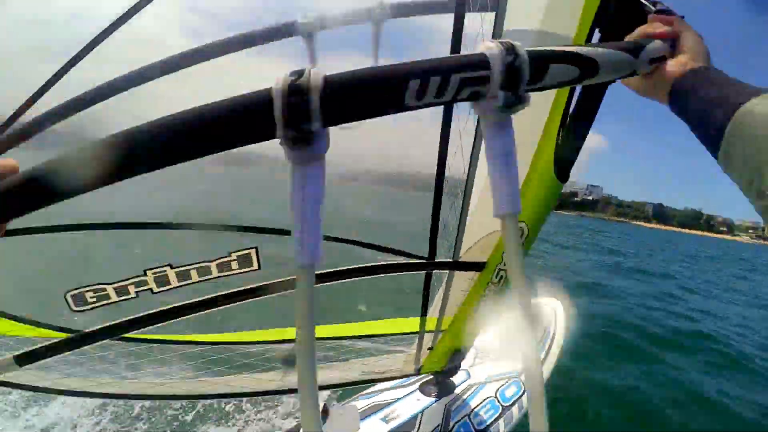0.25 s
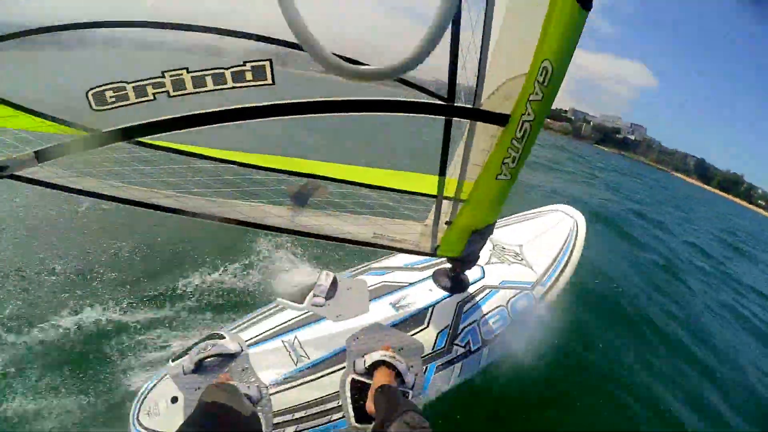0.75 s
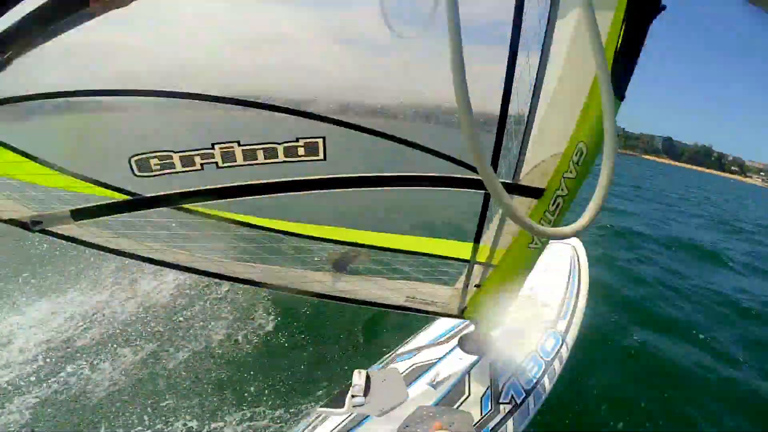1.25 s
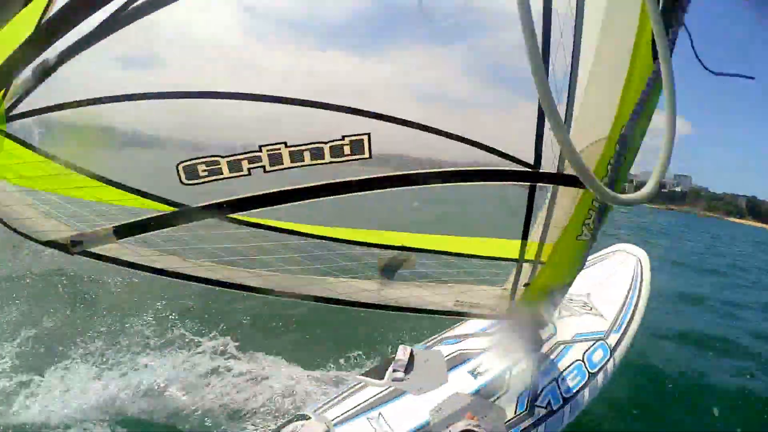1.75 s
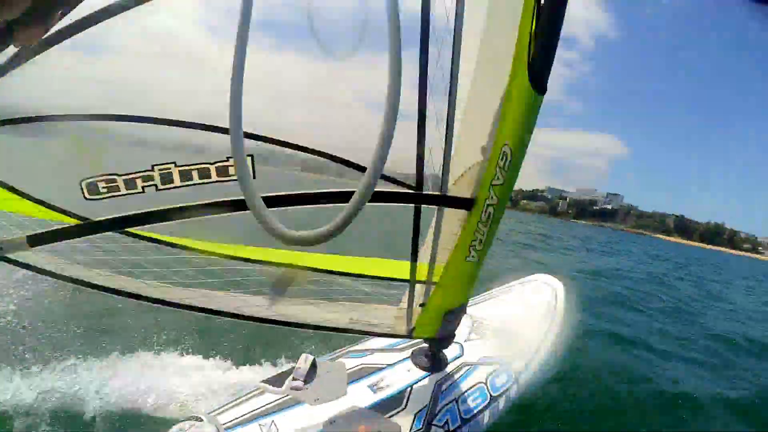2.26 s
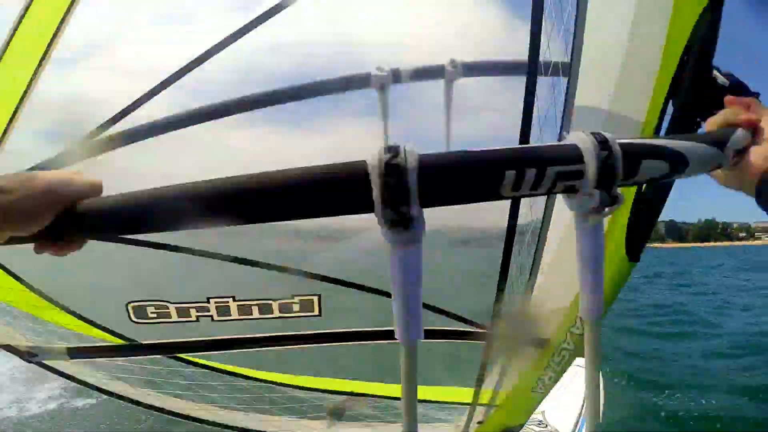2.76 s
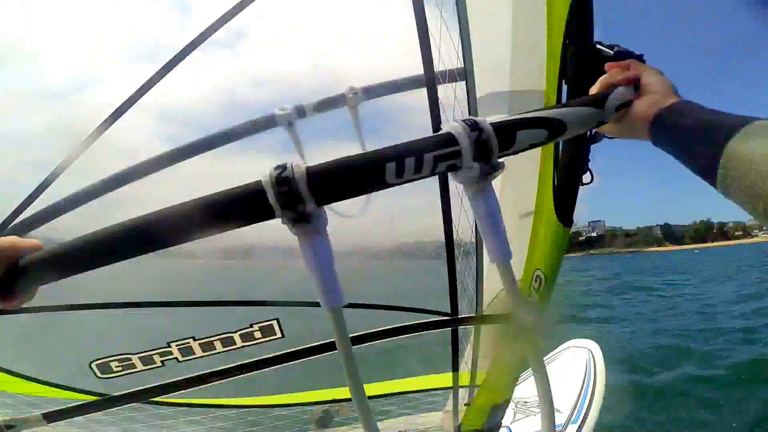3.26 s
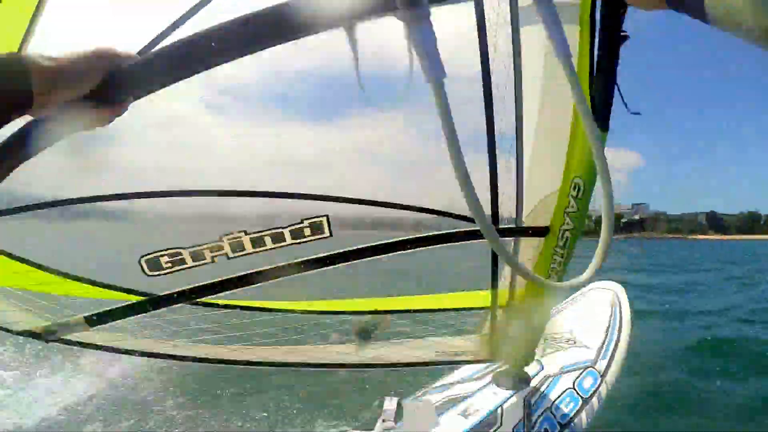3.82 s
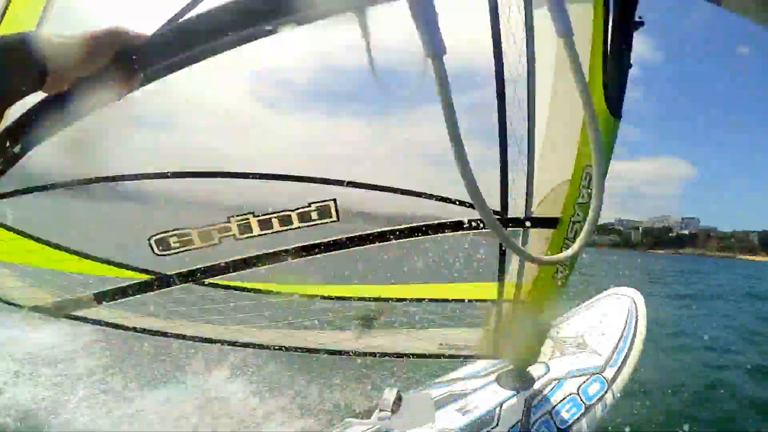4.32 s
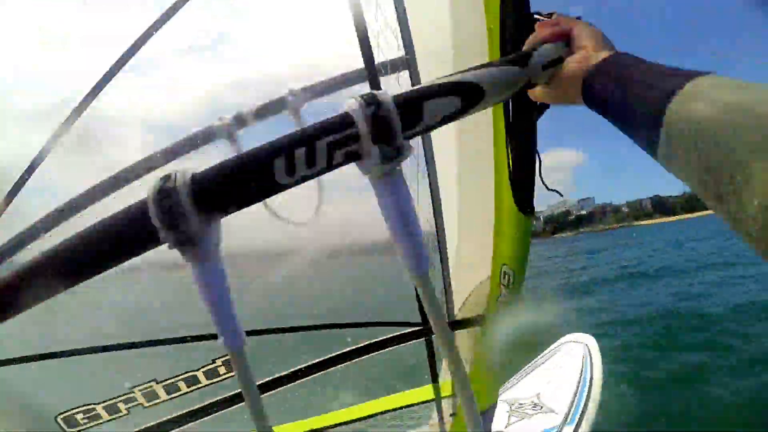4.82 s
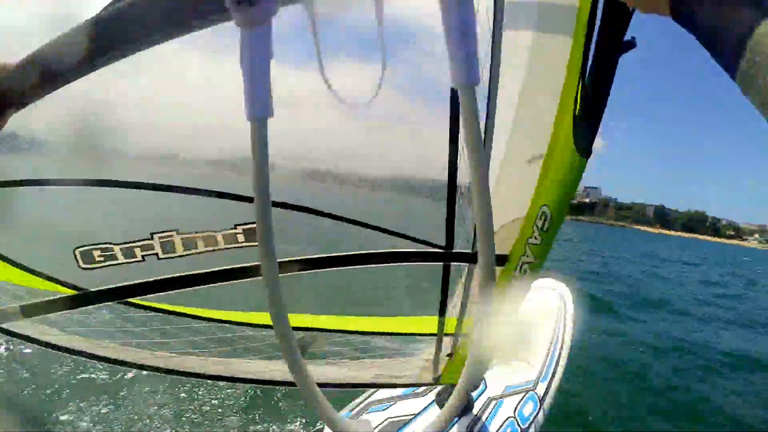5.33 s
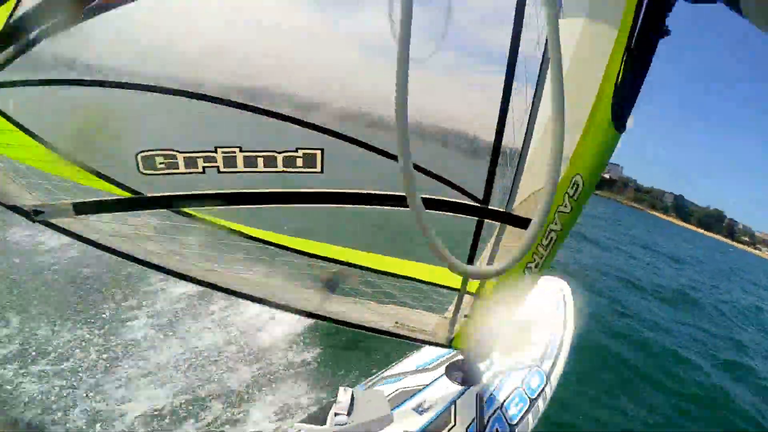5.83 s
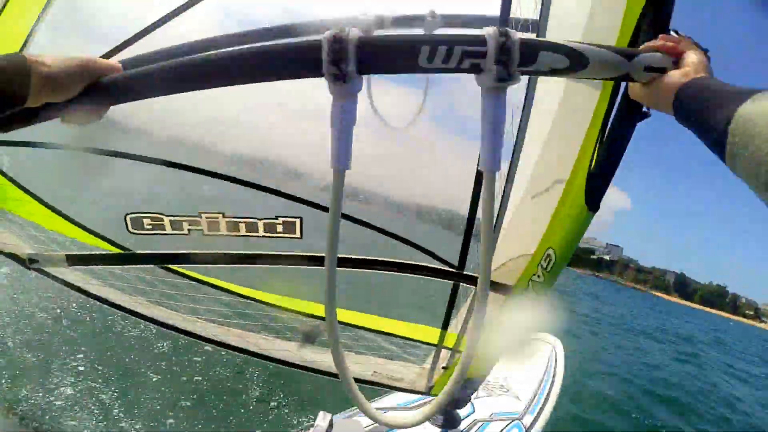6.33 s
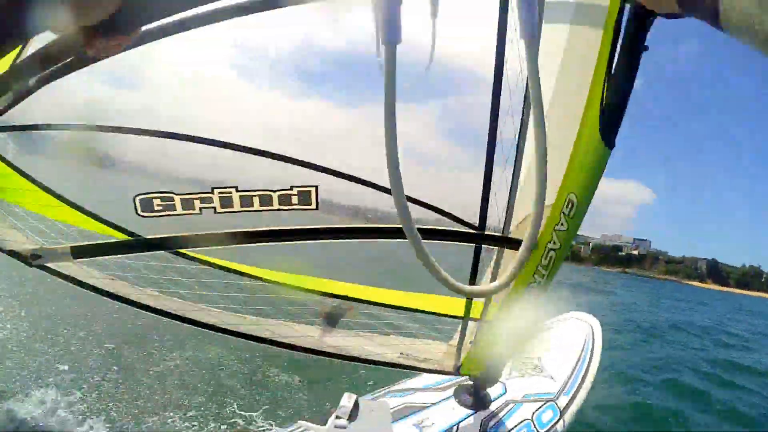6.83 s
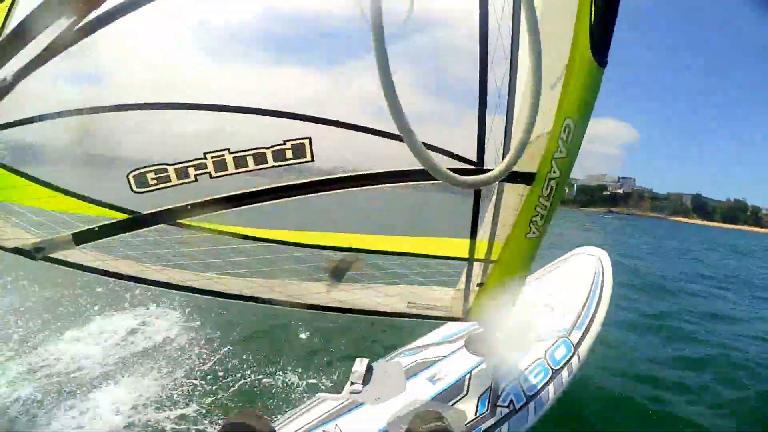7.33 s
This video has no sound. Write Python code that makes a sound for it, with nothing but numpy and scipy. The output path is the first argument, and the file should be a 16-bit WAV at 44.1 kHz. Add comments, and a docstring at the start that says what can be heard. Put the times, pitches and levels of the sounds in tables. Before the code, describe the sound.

A windsurf board races over chop, heard from a small waterproof housing on the sailor. Throughout, bubbly water rushes and gurgles along the rail, with hissing spray in short irregular bursts and dull roars on harder splashes. A strong hollow slap lands at 0.3 seconds, then splashes follow around 0.7, 1.0 and 1.5, where a heavy low gust thumps. Near 1.75 and 2.3, tiny gliding gulps of trapped air sound under the hull. Knocks grow frequent from 2 to 4 seconds. Sharp drops tick on the housing at 3.7 to 4.3 and at 4.8, with a bright splash at 4.1 and a hard double slap at 4.6. Afterwards slaps thin out, but splashes continue around 5.2, 5.5, 6.0, 6.5 and 7.0. A weak wavering rig tone comes and goes; a last gust and splash swell at 7.5.

```python
"""Windsurf board over chop

A board planes over chop, heard from a small waterproof housing worn by the sailor.
Wash, spray and droplets are coloured noise and random grains that surge with each splash.
Chop slaps the hull in short hollow knocks and drops tick on the housing: clicks into ringing modes.
Wind is lumpy low noise over a slow heave; the rig sounds a faint wavering note.
Two short gliding tones are air pockets gulping under the hull."""
import sys
import numpy as np
from scipy import signal
from scipy.fft import rfft, irfft
from scipy.io import wavfile

SR = 44100
rng = np.random.default_rng(int(sys.argv[2]) if len(sys.argv) > 2 else 0)


def to_wav(s):
    """Save 16-bit WAV."""
    ch = np.atleast_2d(s).T  # columns
    pcm = np.round(np.clip(ch, -1, 1) * 32767)  # PCM
    wavfile.write(sys.argv[1], SR, pcm.astype(np.int16))


N = 334278


def from_db(db):
    """Decibels to amplitude gain."""
    return 10 ** (np.asarray(db) / 20)


def rms_one(x):
    """Scale to unit rms."""
    return x / np.sqrt(np.mean(x ** 2) + 1e-20)


def in_time(rows):
    """Interpolate each column of a (time, values...) table at every sample."""
    s, *columns = np.transpose(rows)
    t = np.arange(N) / SR
    return [np.interp(t, s, column) for column in columns]


def coloured(x, spectrum):
    """Filter by a spectrum, linear in dB over log frequency and silent outside it; rms 1."""
    hz, db = np.transpose(spectrum)
    bins = np.maximum(np.fft.rfftfreq(N, 1 / SR), 1e-3)
    gain_db = np.interp(np.log(bins), np.log(hz), db, left=-np.inf, right=-np.inf)
    return rms_one(irfft(rfft(x) * from_db(gain_db), N))


def drift(corner_hz):
    """Smooth random curve, rms 1: noise rolled off above the corner."""
    bins = np.fft.rfftfreq(N, 1 / SR)
    spectrum = rfft(rng.standard_normal(N))
    return rms_one(irfft(spectrum / (1 + (bins / corner_hz) ** 2), N))


def ring(clicks, hz, t60_s):
    """Two-pole resonator: a unit click starts a decaying sine of height 1."""
    radius = from_db(-60 / (t60_s * SR))
    w = 2 * np.pi * hz / SR
    feedback = [1, -2 * radius * np.cos(w), radius * radius]
    return signal.lfilter([0, np.sin(w)], feedback, clicks + 1e-18)


def clicks_at(times_s, level_db):
    """One click of the given level at each time."""
    out = np.zeros(N)
    index = np.clip(np.round(times_s * SR).astype(int), 0, N - 1)
    np.add.at(out, index, from_db(level_db))
    return out


def grains(per_s, spread_db):
    """Random tiny impacts, many weak and a few strong; rms 1."""
    sizes = from_db(spread_db * np.minimum(rng.exponential(1, N), 5))
    signs = rng.choice([-1, 1], N)
    present = rng.random(N) < per_s / SR
    return rms_one(sizes * signs * present)


def swells(floor_db, crests_s, lengths_s, peaks_db, rise, fall, shape):
    """Level in dB of a floor plus events, summed in power; rise and fall are shares of length."""
    t = np.arange(0, N + 32, 32) / SR
    age = (t - crests_s[:, None]) / lengths_s[:, None]
    flank = np.abs(age / np.where(age < 0, rise, fall)) ** shape
    events = from_db(peaks_db)[:, None] * np.exp(-np.minimum(flank, 20))
    power = np.sum(events ** 2, axis=0)
    return 10 * np.log10(from_db(floor_db) ** 2 + np.interp(np.arange(N) / SR, t, power))


# steady rush of the wake between splashes: (time [s], level [dB])
WAKE_RUSH = [(0.0, -39.5), (0.2, -38.5), (0.39, -42), (0.6, -36.5), (0.97, -41.5), (1.33, -37), (1.75, -44),
             (2.3, -41), (2.6, -40.5), (3.1, -38.5), (3.35, -43), (3.55, -38), (4.03, -42.5), (4.85, -43.5),
             (5.85, -36.5), (6.36, -44), (6.65, -40.5), (7.3, -41)]
# churning of the water along the rail: (time [s], level [dB])
RAIL_CHURN = [(0.0, -44.5), (0.95, -45.5), (1.55, -41), (1.8, -45.5), (2.2, -38.5), (2.87, -43), (4.4, -43),
              (5.7, -42), (6.4, -43.5), (7.5, -43.5)]
# splashes thrown off waves:
# (crest time [s], length [s], wash level [dB], spray level [dB], housing droplet level [dB])
WAVE_SPLASHES = [(0.285, 0.026, -34.5, -26.5, -45), (0.466, 0.017, -33.5, -30.5, -58),
                 (0.699, 0.035, -30.5, -24.5, -49), (1.038, 0.026, -33, -26, -53),
                 (1.451, 0.048, -30.5, -24.5, -56), (1.537, 0.096, -31.5, -33.5, -63),
                 (1.946, 0.038, -29, -26, -47), (2.212, 0.036, -49, -33, -60),
                 (2.425, 0.047, -31, -29.5, -48), (2.719, 0.028, -32.5, -29, -51),
                 (3.17, 0.065, -34, -34.5, -53), (3.657, 0.03, -32, -34, -45),
                 (3.7, 0.073, -36.5, -42, -47), (3.916, 0.022, -31.5, -49, -58),
                 (4.104, 0.017, -26, -25, -45), (4.234, 0.027, -51, -28.5, -38),
                 (4.278, 0.054, -32, -28, -50), (4.562, 0.063, -36.5, -32, -44),
                 (4.662, 0.036, -34, -24, -38), (4.868, 0.013, -56, -34, -69),
                 (4.953, 0.04, -37.5, -39.5, -58), (5.004, 0.081, -48, -35.5, -47),
                 (5.21, 0.034, -30, -25, -42), (5.27, 0.041, -38.5, -32.5, -55),
                 (5.434, 0.031, -34.5, -40, -62), (5.517, 0.003, -31, -21, -57),
                 (5.594, 0.035, -36.5, -29, -61), (5.94, 0.11, -52, -33.5, -45),
                 (6.002, 0.051, -28.5, -28.5, -47), (6.13, 0.03, -48, -27.5, -64),
                 (6.192, 0.052, -37, -27, -54), (6.455, 0.093, -38.5, -27.5, -49),
                 (6.532, 0.026, -30.5, -26.5, -53), (6.997, 0.042, -30.5, -29, -43),
                 (7.49, 0.066, -31, -28, -41.5)]
MIST_DB = -14  # droplets that always reach the housing, relative to the wake


def surges():
    """Each splash lifts wash, spray and droplets above their floors; the three levels in dB."""
    (wake_db,), (churn_db,) = in_time(WAKE_RUSH), in_time(RAIL_CHURN)
    s, length_s, *peaks_db = np.transpose(WAVE_SPLASHES)
    floors_db = (churn_db, wake_db, wake_db + MIST_DB)
    return [swells(floor_db, s, length_s, peak_db, rise=0.45, fall=0.73, shape=0.64)
            for floor_db, peak_db in zip(floors_db, peaks_db)]


# wash colour through the housing: (frequency [Hz], relative density [dB per Hz])
WASH_COLOUR = [(200, -1.5), (350, -10.5), (580, -9), (720, -5), (900, -5.5), (1020, -5), (1150, -1),
               (1310, 3.5), (1460, -7), (1650, -2.5), (1870, 3.5), (2030, 0), (2250, -10.5), (3200, -5.5)]


def wash(level_db):
    """Bubbles burst in the churned water along the rail, in uneven clumps."""
    bursts = grains(per_s=5000, spread_db=1.5) * from_db(2.7 * drift(25))
    return from_db(level_db + 0.7) * coloured(bursts, WASH_COLOUR)


def gurgle(level_db, per_s, cycles):
    """Larger bubbles in the wash ring long enough to have a pitch, down 60 dB after `cycles`."""
    pitches_hz = np.geomspace(850, 2150, 24)
    sizes = from_db(3.5 * rng.standard_normal(N).clip(-2, 2))
    born = rng.random(N) < per_s / SR
    dealt = rng.integers(0, len(pitches_hz), N)
    rings = sum(ring(sizes * born * (dealt == k), hz, cycles / hz) for k, hz in enumerate(pitches_hz))
    return from_db(level_db - 5) * rms_one(rings)


# roar of solid water thrown aside: (frequency [Hz], relative density [dB per Hz])
PLUNGE_COLOUR = [(150, -9), (300, 3.5), (450, -1.5), (600, -11), (760, 4.5), (950, -20), (1200, -19)]


def plunge(level_db, steepness):
    """Only a hard surge throws solid water: the dull roar outgrows the wash, up to a cap."""
    roar_db = -38.5 + steepness * np.minimum(level_db + 33, 2)
    return from_db(roar_db) * coloured(grains(per_s=2500, spread_db=2.5), PLUNGE_COLOUR)


# spray colour through the housing: (frequency [Hz], relative density [dB per Hz])
SPRAY_COLOUR = [(1900, -6), (2400, -16.5), (3200, -8), (3500, 1.5), (3750, 1), (4050, -2.5), (4450, -6),
                (4720, -19), (5600, -21), (6550, -17), (7100, -25.5), (7700, -29.5), (10700, -30.5),
                (14000, -37.5)]


def spray(level_db):
    """The thrown sheet of spray falls back as a dense fizz."""
    fizz = grains(per_s=18000, spread_db=3.5) * from_db(1.74 * drift(46))
    return from_db(level_db + 1.3) * coloured(fizz, SPRAY_COLOUR)


# droplet colour on the housing: (frequency [Hz], relative density [dB per Hz])
SHOWER_COLOUR = [(2000, -26), (3000, -11), (4000, 13), (5200, 7.5), (6600, 15.5), (7800, 0.5), (9500, -3),
                 (10800, 6.5), (12500, -12), (14500, -12)]


def shower(level_db):
    """Fine droplets patter on the housing; coarse ones join in only when the level is high."""
    coarse = np.clip((level_db + 39) / 12, 0, .8)  # share of power
    fine_drops = np.sqrt(1 - coarse) * rng.standard_normal(N)
    coarse_drops = np.sqrt(coarse) * grains(per_s=3200, spread_db=7)
    gain = from_db(level_db + 1.0 + 3 * coarse)
    return gain * coloured(fine_drops + coarse_drops, SHOWER_COLOUR)


# gusts on the housing: (crest time [s], length [s], buffeting level [dB], heave level [dB])
AIR_GUSTS = [(0.233, 0.017, -44, -9), (0.396, 0.049, -28.5, -14.5), (0.626, 0.076, -30, -12.5),
             (0.828, 0.048, -29.5, -17), (1.56, 0.052, -20.5, -2.5), (1.99, 0.13, -25, -13),
             (2.186, 0.082, -30.5, -11.5), (2.54, 0.19, -33, -19), (2.868, 0.047, -30, -19.5),
             (3.043, 0.03, -34, -13.5), (3.218, 0.048, -22.5, -9.5), (3.434, 0.093, -33, -12.5),
             (3.78, 0.15, -25, -11.5), (4.197, 0.08, -25.5, -10.5), (4.46, 0.07, -44, -16.5),
             (4.669, 0.045, -26, -5), (4.87, 0.017, -22.5, -13), (5.16, 0.031, -29.5, -11),
             (5.315, 0.056, -27, -5.5), (5.52, 0.054, -32.5, -17), (6.064, 0.079, -27.5, -15),
             (6.257, 0.027, -40, -15), (6.628, 0.056, -29.5, -17.5), (6.795, 0.027, -36, -13.5),
             (7.082, 0.076, -27.5, -12), (7.59, 0.079, -19.5, -6.5)]
BREEZE_DB, BREEZE_HEAVE_DB = -39, -25  # steady headwind between gusts


def gusts():
    """Each gust lifts buffeting and heave above the steady headwind; the two levels in dB."""
    s, length_s, *peaks_db = np.transpose(AIR_GUSTS)
    return [swells(floor_db, s, length_s, peak_db, rise=0.66, fall=1, shape=1.07)
            for floor_db, peak_db in zip((BREEZE_DB, BREEZE_HEAVE_DB), peaks_db)]


# buffeting colour through the housing: (frequency [Hz], relative density [dB per Hz])
BUFFET_COLOUR = [(22, -22), (31, 9.5), (45, 11.5), (70, 2), (110, -3), (200, -12), (300, -20.5), (500, -25),
                 (900, -42)]


def wind(level_db, apart_db):
    """Small eddies buffet the housing in lumps, almost alike left and right."""
    mid, side = (coloured(rng.standard_normal(N), BUFFET_COLOUR) for _ in range(2))
    lumps = rms_one(from_db(3.6 * drift(25)))
    stereo = mid + from_db(apart_db) * side * np.array([[1], [-1]])
    return from_db(level_db + 4.5) * lumps * stereo


def heave(level_db, hz, lean_db):
    """Large eddies rock the pressure at the very bottom of hearing, a little more on the left."""
    rate_hz = hz * from_db(1.8 * drift(15.05))
    rocking = rms_one(np.sin(2 * np.pi * np.cumsum(rate_hz) / SR))
    return from_db(level_db) * rocking * from_db([[lean_db], [-lean_db]])


# single drops on the housing: (time [s], level [dB])
HOUSING_DROPS = [(0.228, -24), (1.546, -22), (1.999, -22), (3.1662, -23), (3.7074, -19), (3.7122, -12.5),
                 (3.8117, -16.5), (3.929, -24), (3.954, -18), (4.0974, -23.5), (4.231, -34), (4.2482, -23),
                 (4.2653, -16), (4.2955, -12.5), (4.306, -18), (4.3291, -25), (4.5926, -19), (4.605, -21),
                 (4.7059, -19), (4.715, -20), (4.804, -11.5), (5.2034, -33), (5.5144, -39)]
# ringing of the housing wall: (frequency [Hz], level [dB], t60 [s])
HOUSING_MODES = [(1470, -4, 0.0042), (2560, 0.5, 0.0039), (3100, -3.5, 0.0083), (4010, -2, 0.0041),
                 (5160, -3.5, 0.0044), (5320, -8, 0.0079), (6460, -10, 0.0044), (8400, -8.5, 0.00099),
                 (10300, -12.5, 0.0021), (13000, -22, 0.0024)]


def drops(splat_s, splat_db):
    """Drops burst on the housing: a sharp tick and a brief ragged splat into its wall modes."""
    s, level_db = np.transpose(HOUSING_DROPS)
    ticks = clicks_at(s + 0.00069, level_db - 2.0)
    fade = np.exp(-1 / (splat_s * SR))
    envelope = signal.lfilter([np.sqrt(1 - fade ** 2)], [1, -fade], ticks + 1e-18)
    splats = envelope * rng.standard_normal(N)
    force = ticks + from_db(splat_db) * splats
    return sum((-1) ** k * ring(force, hz, t60_s) * from_db(db)
               for k, (hz, db, t60_s) in enumerate(HOUSING_MODES))


# hollow knock of the hull: (frequency [Hz], level [dB], t60 [s])
KNOCK_MODES = [(837, -6.5, 0.036), (895, 6, 0.031), (1030, 5.5, 0.0034), (1146, 1, 0.023),
               (1289, 3.5, 0.036), (1480, 8.5, 0.0068), (1690, -4, 0.0035), (1925, 9, 0.014),
               (3030, -2.5, 0.012), (3300, -11, 0.014), (1000, -13.5, 0.11)]
# flexing of the hull: (frequency [Hz], level [dB], t60 [s])
FLEX_MODES = [(146, 18.5, 0.016), (171, 4.5, 0.025), (218, 4, 0.045)]
KNOCK_HZ, SMACK_HZ = 1080, 1790  # hardness tilts the modes between these pitches
SLAP_RING_S = 0.12


def slap(strength_db, hardness_db, thump_db, trail_db, trail_s, detune, scatter_db):
    """A slap rings the hollow modes, the higher ones more when hard; the hull flexes with a thump."""
    hit = np.zeros(int(SLAP_RING_S * SR))
    hit[0] = 1
    # uneven landing: weaker contacts trail the first by a few milliseconds
    lags_s = trail_s * (0.304 + rng.random(3))
    contacts = hit + from_db(trail_db) * sum(np.roll(hit, int(lag_s * SR)) for lag_s in lags_s)
    # the wetted patch differs from wave to wave and shifts the pitch
    tuning = 1 + detune * rng.uniform(-1, 1)
    knock = 0
    for k, (hz, db, t60_s) in enumerate(KNOCK_MODES):
        tilt_db = hardness_db * np.interp(hz, [KNOCK_HZ, SMACK_HZ], [0, 1])
        mode_db = strength_db + tilt_db + db + scatter_db * rng.standard_normal()
        gain = from_db(mode_db) * (-1) ** (k // 2)
        # pressure follows wall velocity, so little spills below each mode
        velocity = np.diff(ring(contacts, hz * tuning, t60_s), prepend=0) * SR / (2 * np.pi * hz)
        knock += gain * velocity
    flex = sum(from_db(thump_db + db + scatter_db * rng.standard_normal()) * ring(hit, hz, t60_s)
               for hz, db, t60_s in FLEX_MODES)
    # the broad push that flexes the hull is too slow to reach the middle range
    return knock + signal.sosfilt(signal.butter(2, 330, fs=SR, output="sos"), flex)


# chop on the hull: (time [s], strength [dB], hardness: high modes over low [dB], thump [dB])
HULL_SLAPS = [(0.2984, -11, -10, -30.5), (0.324, -30, -17, -36), (0.3715, -22, -11, -32),
              (0.386, -42, -1, -33.5), (0.61, -24.5, -11, -48), (0.6141, -23.5, -3, -40),
              (0.818, -34.5, -6, -40.5), (1.817, -31.5, -0.5, -40), (1.829, -39, 0, -30.5),
              (1.942, -34, -7, -39), (1.9973, -18, 6, -25), (2.178, -26, -9, -34), (2.282, -31, -23, -39.5),
              (2.437, -23, -9, -40), (2.487, -27.5, -38, -38), (2.554, -31, -6, -40), (2.58, -28, -14, -49),
              (2.619, -30.5, -26, -41), (2.679, -23, -2, -39.5), (2.687, -26, -34, -56),
              (3.0237, -18.5, -14, -45), (3.2097, -24.5, -0.5, -30.5), (3.263, -25.5, -10, -39),
              (3.283, -20.5, 1.5, -31.5), (3.391, -25, -21, -44), (3.478, -25.5, -3.5, -39.5),
              (3.591, -43.5, 15, -43), (3.692, -19, -4, -51), (3.697, -19.5, -2, -30.5),
              (3.76, -32.5, 3.5, -32), (3.814, -18, -3, -26.5), (3.868, -28, -1.5, -36),
              (3.911, -23, -22, -34), (3.927, -29.5, -3, -37), (4.221, -30, -6, -31.5),
              (4.327, -26, -11, -51), (4.6256, -11.5, -3, -35), (4.631, -17, -1.5, -25),
              (4.679, -31.5, 5, -39), (4.707, -28.5, 8, -44), (4.714, -24.5, 0, -53),
              (5.204, -34.5, 8, -49), (5.994, -25, -14, -53), (6.066, -34, -13, -41),
              (6.1164, -31.5, 2, -36.5), (6.535, -33.5, -3, -49), (6.658, -35, -4, -47),
              (7.0597, -20, -1, -38), (7.493, -23.5, -7, -42)]
RIPPLES_COUNT = 8
RIPPLE_STRENGTH_DB, RIPPLE_HARDNESS_DB, RIPPLE_THUMP_DB = -34.5, 1, -41


def chop():
    """The distinct slaps, and small ripples scattered at random times."""
    times_s = rng.random(RIPPLES_COUNT) * N / SR
    ripples = [(s, RIPPLE_STRENGTH_DB, RIPPLE_HARDNESS_DB, RIPPLE_THUMP_DB) for s in times_s]
    return np.array(list(HULL_SLAPS) + ripples)


def slaps(soft_hz, contact_s):
    """All the chop against the hull; water is a soft hammer: delayed and low-passed."""
    out = np.zeros(N + SR)
    for s, *blow in chop():
        sound = slap(*blow, trail_db=-16, trail_s=0.006, detune=0.053, scatter_db=1.5)
        start = int((s + contact_s) * SR)
        out[start:start + len(sound)] += sound
    return signal.sosfilt(signal.butter(2, soft_hz, fs=SR, output="sos"), out[:N])


# swells of the rig note: (crest time [s], length [s], level [dB])
RIG_NOTE_SWELLS = [(0.6, 0.12, -44.5), (1.146, 0.22, -47), (1.894, 0.25, -48.5), (2.702, 0.031, -39),
                   (3.027, 0.11, -47), (3.5, 0.11, -45), (4.03, 0.04, -45.5), (4.45, 0.18, -47.5),
                   (4.917, 0.11, -43), (5.612, 0.24, -42), (6.12, 0.062, -40), (7.2, 0.3, -47.5)]
RIG_CALM_DB = -64


def rig_note(hz, waver_hz, flutter_db):
    """Air passing over a hollow in the rig sounds one weak, unsteady note."""
    level_db = swells(RIG_CALM_DB, *np.transpose(RIG_NOTE_SWELLS), rise=1.0, fall=1.43, shape=1.7)
    phase = 2 * np.pi * np.cumsum(hz + waver_hz * drift(83.4)) / SR
    note = rms_one(np.sin(phase) * from_db(flutter_db * drift(27)))
    return from_db(level_db + 2.5) * note


# air pockets under the hull: (start [s], length [s], from [Hz], to [Hz], level [dB])
AIR_GULPS = [(1.747, 0.061, 1360, 974, -35.5), (2.28, 0.034, 846, 1080, -34)]


def gulp(start_s, length_s, from_hz, to_hz, level_db):
    """A pocket of air opens under the hull and gives one short gliding note."""
    progress = np.clip((np.arange(N) / SR - start_s) / length_s, 0, 1)
    hz = from_hz + (to_hz - from_hz) * progress
    tone = np.sin(2 * np.pi * np.cumsum(hz) / SR)
    return from_db(level_db + 2 * drift(53)) * np.sin(np.pi * progress) * tone


def scene():
    """Water and rig are heard dead centre, over the rumble of the wind."""
    wash_db, spray_db, shower_db = surges()
    buffet_db, heave_db = gusts()
    water = wash(wash_db) + gurgle(wash_db, per_s=110, cycles=99) + plunge(wash_db, steepness=2.34)
    water += spray(spray_db) + shower(shower_db)
    water += drops(splat_s=0.001, splat_db=0.5)
    water += slaps(soft_hz=3300, contact_s=0.001023)
    water += sum(gulp(*row) for row in AIR_GULPS)
    air = wind(buffet_db, apart_db=-39.5) + heave(heave_db, hz=15, lean_db=1.38)
    air = air + rig_note(hz=1014, waver_hz=15, flutter_db=6.0)
    return water + air


CUTOFF_HZ = 14500


def record(dry):
    """Peaks beyond full scale clip, then a steep low-pass cuts the top."""
    low_pass = signal.ellip(10, .2, 80, CUTOFF_HZ, fs=SR, output="sos")
    return signal.sosfilt(low_pass, np.clip(dry, -1, 1))


dry = scene()
out = record(dry)
to_wav(out)
```